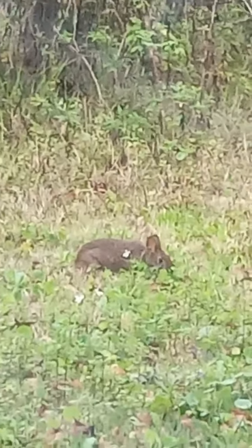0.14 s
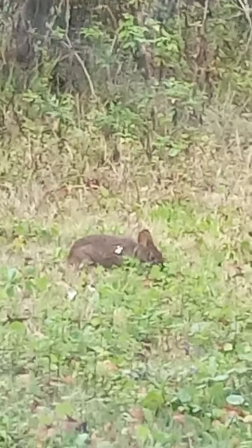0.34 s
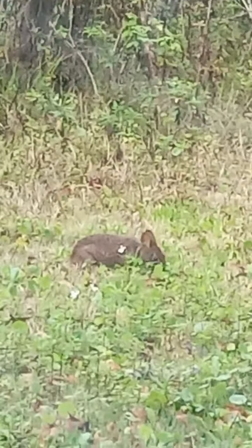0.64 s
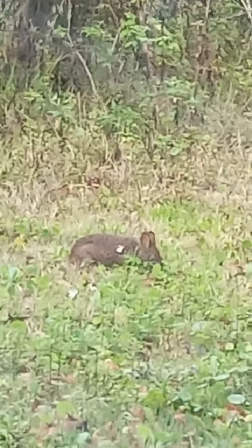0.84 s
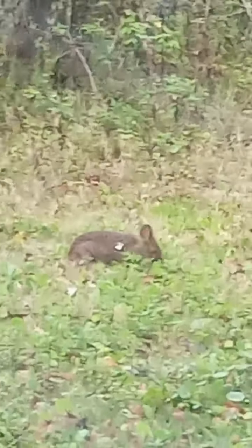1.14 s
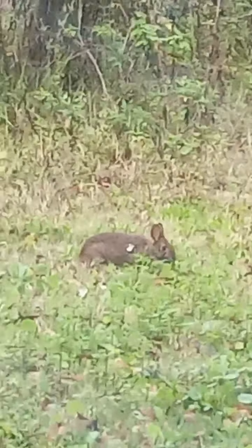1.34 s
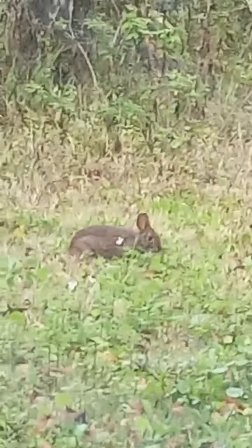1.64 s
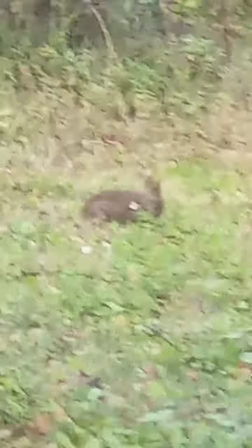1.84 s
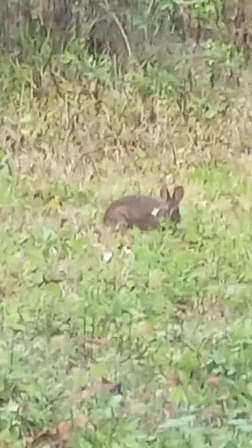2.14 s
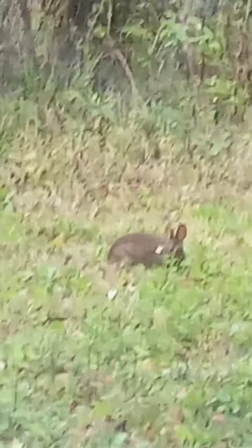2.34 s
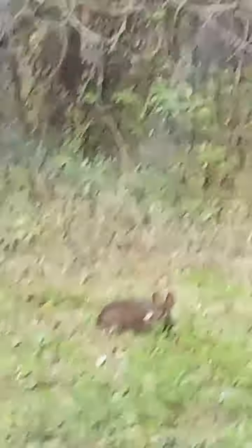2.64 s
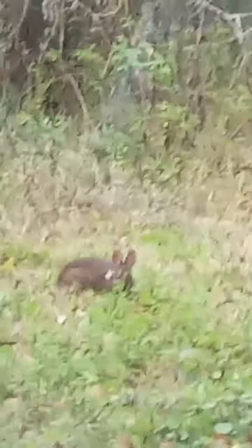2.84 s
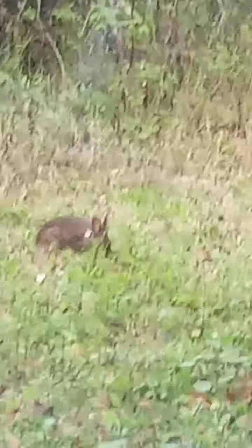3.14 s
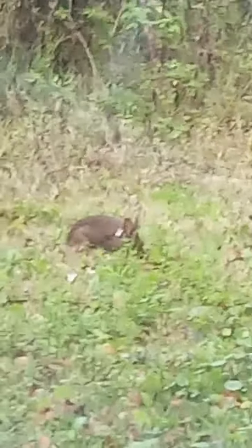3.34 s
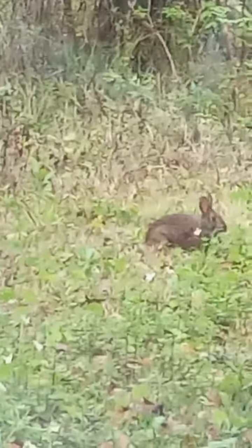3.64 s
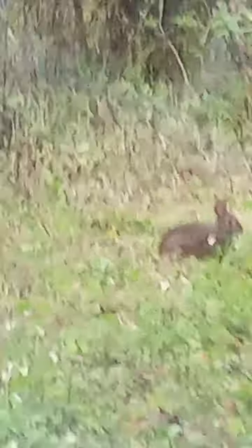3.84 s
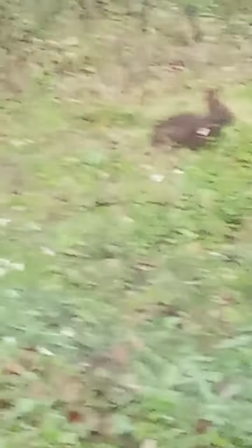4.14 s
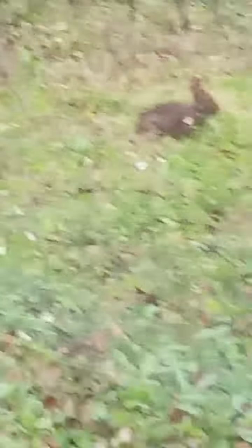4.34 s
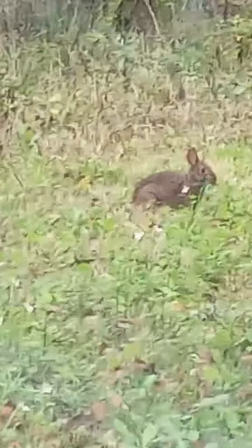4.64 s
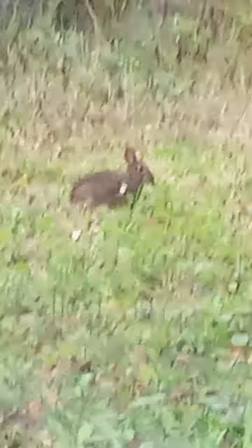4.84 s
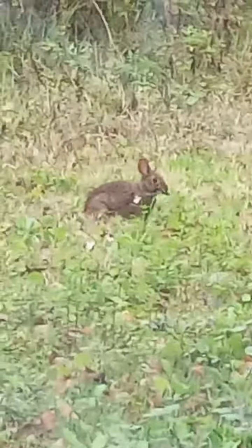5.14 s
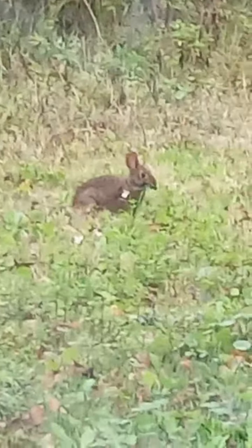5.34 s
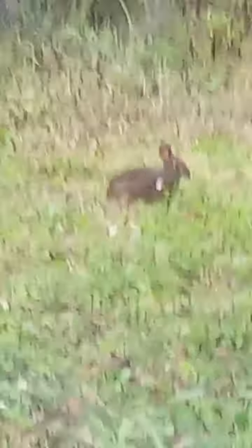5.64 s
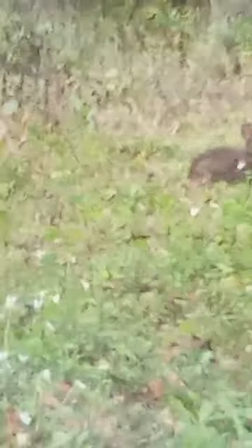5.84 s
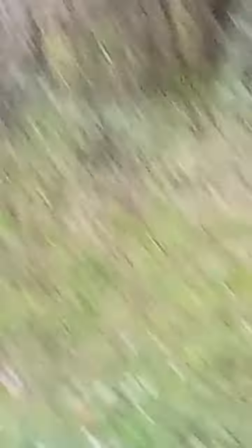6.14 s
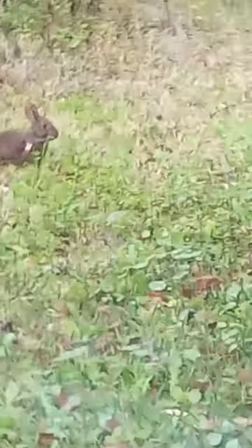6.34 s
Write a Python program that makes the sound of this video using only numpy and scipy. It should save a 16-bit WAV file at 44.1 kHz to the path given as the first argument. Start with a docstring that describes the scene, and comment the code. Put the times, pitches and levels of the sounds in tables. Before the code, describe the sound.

Someone clicks their tongue six times outdoors while fingers bump the microphone and far traffic rumbles softly.

```python
"""Six sharp clicks close by, probably a tongue: quick, briefly ringing double pulses in two colours.
A hand holds a phone: soft knocks swing it, fingers tick and rub on the case.
Behind, distant road traffic rumbles over a meadow, with an engine drone and faint whistles.
Two microphone ports hear nearly the same sound, the left one about a millisecond late."""
import sys
import numpy as np
from scipy import signal
from scipy.fft import rfft, irfft, next_fast_len
from scipy.io import wavfile
from scipy.ndimage import uniform_filter1d

SR = 44100
rng = np.random.default_rng(int(sys.argv[2]) if len(sys.argv) > 2 else 0)


def waveform_to_disk(signal):
    """Save audio, clipped to [-1, 1], as 16-bit WAV at the path in sys.argv[1]."""
    frames = np.transpose(np.atleast_2d(signal))
    scaled = np.clip(frames, -1, 1) * 32767
    samples = np.round(scaled).astype(np.int16)
    wavfile.write(sys.argv[1], SR, samples)


N = 286058

# Each row: start in seconds, peak in dB, click colour from 0 to 1.
TONGUE_CLICKS = [(2.5081, -16, 0.1), (2.8467, -18, 0.94), (3.1859, -15.5, 0.11), (3.5470, -17, 0.93),
                 (3.8659, -16, .12), (4.017, -17.5, 0.93)]
# Resonances of a click in Hz.
MODE_HZ = [1050, 1388, 1458, 1750, 1870, 2036, 2136, 2222, 2630, 2805, 3165, 3375, 3635, 3950, 4270, 8500]
# One row per resonance. Each row: t60 in seconds, gain in dB at colour 0, gain in dB at colour 1.
MODE_RING = [(.05, -57.5, -46), (0.026, 0, 0.5), (0.02, -9.5, 1), (0.031, 0.8, -6.5), (0.059, -27, -7.5),
             (0.19, -7.5, -29.5), (0.016, -31, 3.5), (0.022, -2.5, -9.5), (.04, -21.5, -2.5),
             (0.051, -12, -12.5), (0.024, -13, -9.5), (.025, -18, -18), (.03, -35, -24), (.03, -39, -25),
             (0.042, -45.5, -51.5), (0.044, -41, -56.5)]
# Each row: start in seconds, level in dB, frequency in Hz, t60 in seconds.
PHONE_KNOCKS = [(0.113, -44, 315, 0.22), (2.03, -35, 302, 0.026), (2.048, -33.5, 152, 0.058),
                (2.084, -40., 1356, 0.039), (2.116, -30.5, 1455, 0.032), (2.115, -45.5, 906, 0.054),
                (2.438, -43, 146, 0.24), (3.941, -28.5, 928, 0.086), (3.947, -24, 508.8, 0.068),
                (3.955, -19, 254, 0.08), (3.979, -31.5, 115.8, 0.23), (5.627, -36.5, 138, 0.079),
                (5.8339, -13, 210, 0.059), (5.832, -25.5, 118.6, 0.17), (5.8512, -14, 202, 0.061),
                (5.878, -27.5, 173.4, 0.099)]
# Each row: time in seconds, peak in dB, centre in Hz, spread in octaves, rise and t60 in seconds.
CASE_TICKS = [(1.226, -52, 6000, 1.6, 0.00081, 0.011), (1.514, -56, 5900, 1.1, 0.001, 0.0083),
              (1.755, -49, 903, 0.14, 0.0037, 0.053), (1.874, -52, 3900, 0.86, 0.0014, 0.0075),
              (2.03, -47.5, 1040, 0.71, 0.0018, 0.078), (2.0842, -33, 4170, 0.58, 0.0012, 0.032),
              (2.116, -31.5, 2940, 0.84, 0.0031, 0.051), (3.917, -35, 5608, 0.3, 0.0016, .03),
              (3.948, -14, 3800, 1.43, 0.0044, 0.047), (5.624, -23.5, 5000, 0.85, 0.00096, 0.0036),
              (5.729, -41, 4160, 1.58, 0.001, 0.047), (5.834, -38, 5060, 1.07, 0.0028, 0.027),
              (6.060, -47, 3270, 0.54, .0011, .012), (6.081, -27, 8200, 1.2, 0.00059, 0.016),
              (6.1211, -28, 6600, 0.8, 0.00078, 0.012), (6.369, -60, 7000, 0.97, .0008, 0.007),
              (6.4546, -48, 3200, 0.36, 0.0018, 0.071)]
# Each row: start, crest and end in seconds, crest level in dB, centre in Hz, spread in octaves,
# top hiss in dB relative to the main band.
FINGER_STROKES = [(1.031, 1.057, 1.11, -68, 5000, 0.46, -5), (1.203, 1.226, 1.265, -67, 2940, .75, 8),
                  (1.202, 1.58, 1.95, -74, 2750, 1.05, -14), (1.999, 2.14, 2.3, -68.5, 2460, 1.3, -32),
                  (2.248, 2.41, 2.52, -67, 2830, 1.17, -29), (2.543, 2.57, 2.62, -65.5, 5500, 0.77, -10),
                  (2.577, 2.643, 2.7, -64.5, 5600, 0.49, -12), (3.879, 3.934, 3.95, -50, 5170, 1, -26),
                  (3.917, 3.949, 3.975, -35, 4800, 1.3, -6), (3.961, 3.99, 4.05, -48, 5550, 0.53, -13),
                  (4.003, 4.038, 4.11, -56, 4930, 0.87, -10), (5.621, 5.623, 5.68, -57.5, 3930, 0.85, -20),
                  (5.696, 5.739, 5.78, -60, 2580, 1.2, -24), (5.747, 5.798, 5.9, -54.5, 3500, 0.9, -7.5),
                  (5.867, 5.994, 6.1, -69, 2100, 0.16, -17), (5.899, 6.088, 6.14, -56.5, 4200, 0.81, 1),
                  (6.098, 6.138, 6.26, -51.5, 5000, 0.88, -31), (6.249, 6.312, 6.37, -60.5, 2320, 0.5, -20),
                  (6.269, 6.34, 6.42, -58, 4430, 0.31, -12), (6.434, 6.468, 6.49, -64, 3500, .95, -10)]
# Port response to sound made on the case. Each row: frequency in Hz, gain in dB.
CASE_RESPONSE = [(200, 2.5), (1000, 11.5), (5000, -0.5), (6800, 1), (8000, -12.5), (9300, -6), (11000, -3),
                 (13000, -11.5)]
# Tyre and engine wash. Each row: frequency in Hz, relative density in dB.
ROAD_SPECTRUM = [(20, -15), (35, -7), (54, -12.5), (70, -3), (150, -5.5), (300, -6), (450, -11.5),
                 (600, -14), (900, -23.5), (1300, -28), (2500, -34.5), (5000, -38.5), (7000, -43),
                 (8200, -53), (13000, -51.5)]
# Each row: time in seconds, rumble gain in dB, tyre hiss gain in dB.
ROAD_SWELL = [(0.0, 1, 0.5), (6.49, 0.5, 1)]
# Level of the low engine drone, wavering unevenly. Each row: time in seconds, level in dB.
DRONE_LEVEL = [(0.0, -55), (0.25, -72), (0.45, -57), (0.7, -65), (1.2, -63.5), (1.42, -52.5), (1.6, -61),
               (1.75, -49), (1.97, -59), (2.1, -56.5), (2.75, -60), (2.96, -71.5), (3.35, -56), (3.7, -63),
               (4.15, -52.5), (4.27, -63), (4.55, -52.5), (4.63, -64), (4.78, -46), (4.88, -62),
               (5.04, -51), (5.12, -64), (5.25, -56.5), (6.2, -55.5), (6.49, -58)]
# Each row: start and end in seconds, pitch in Hz, level in dB.
ENGINE_NOTES = [(0.0, 0.617, 142, -59.5), (0.75, 1.507, 142.5, -60.5), (1.9, 2.554, 144, -62),
                (3.0, 3.503, 143.2, -63), (4.15, 4.6, 119.4, -61.5), (4.7, 5.808, 145, -63),
                (5.97, 6.5, 117, -56)]
# Each row: start and end in seconds, pitch in Hz, level in dB.
FAR_WHISTLES = [(1.553, 1.771, 3210, -78), (1.579, 1.751, 1794, -76), (2.327, 2.45, 3370, -88)]
# Each row: frequency in Hz, coherence of the two ports from 0 to 1.
PORT_COHERENCE = [(50, .99), (550, .998), (1600, .99), (2700, .97), (3800, .92), (5500, .75), (10000, .45)]
# Each row: frequency in Hz, left port gain in dB.
LEFT_RESPONSE = [(50, -2.4), (250, -1.9), (480, -.1), (2000, .1), (6000, -.3), (9000, -2.), (12000, -5.)]


def gain_of(db):
    """Decibels to a factor."""
    return 10 ** (np.asarray(db) / 20)


def unit_rms(x):
    """Scales to rms 1."""
    return x / np.sqrt(np.mean(x ** 2) + 1e-20)


def curve_at(points, hz):
    """Interpolates over log frequency."""
    point_hz, value = np.transpose(points)
    return np.interp(np.log(hz + 1), np.log(point_hz + 1), value)


def add(mix, start_s, sound):
    """Mixes a sound in at start_s."""
    part = mix[..., round(start_s * SR):][..., :sound.shape[-1]]
    part += sound[..., :part.shape[-1]]


def band(hz, centre_hz, octaves):
    """Bell over log frequency, rms 1."""
    bell = np.exp(-.5 * (np.log2((hz + 1) / centre_hz) / octaves) ** 2)
    return unit_rms(bell)


def flutter(hz, t, frames):
    """Random frequency-by-time field, smoothed in time, rms 1."""
    return unit_rms(uniform_filter1d(rng.standard_normal((len(t), len(hz))).T, frames, axis=1))


def port_noise(spectrum, fft_size, length, blend):
    """Two-port noise with gain spectrum(hz, t); blend pulls the coherence toward 1."""
    hop = fft_size // 4
    hz, t = np.fft.rfftfreq(fft_size, 1 / SR)[:, None], np.arange(length // hop + 5) * hop / SR
    a, b, c, d = rng.standard_normal((len(t), len(hz), 4)).T
    shared, separate = a + 1j * b, c + 1j * d
    coherence = 1 - (1 - blend) * (1 - curve_at(PORT_COHERENCE, hz))
    left = coherence * shared + np.sqrt(1 - coherence ** 2) * separate
    bins = np.array([left, shared]) * spectrum(hz, t)
    return signal.istft(bins, nperseg=fft_size, noverlap=fft_size - hop)[1][:, :length]


def far_tone(t, hz, db, waver_db, waver_hz):
    """Sine whose level and phase wander at random."""
    span = int(SR / waver_hz)
    level_drift, phase_drift = [unit_rms(uniform_filter1d(uniform_filter1d(noise, span), span))
                                for noise in rng.standard_normal((2, len(t)))]
    phase = 2 * np.pi * np.cumsum(np.broadcast_to(hz, t.shape)) / SR + 0.97 * phase_drift
    return np.sqrt(2) * gain_of(db + waver_db * level_drift) * np.sin(phase)


def clicks():
    """Probably a tongue: a quick double pulse rings briefly and dies fast; two colours alternate."""
    out, t = np.zeros(N), np.arange(3500) / SR
    scatters = rng.standard_normal((len(TONGUE_CLICKS), len(t))) * gain_of(-60 * t / 0.065) * (t > .004)
    for (start_s, peak_db, colour), scatter in zip(TONGUE_CLICKS, scatters):
        ring = np.zeros(len(t))
        for k, (hz, (t60_s, colour0_db, colour1_db)) in enumerate(zip(MODE_HZ, MODE_RING)):
            mode_db = colour0_db + colour * (colour1_db - colour0_db)
            ring += (-1) ** k * gain_of(mode_db - 60 * t / t60_s) * np.sin(2 * np.pi * hz * t)
        ring *= np.sin(np.pi / 2 * np.minimum(t / 0.0032, 1)) ** 2  # attack
        ring *= gain_of(-9 * (t / 0.0091) ** 2)  # dies ever faster
        pulse_gap_s = np.interp(colour, [0, 1], [0.0029, 0.00216])
        second_pulse_db = np.interp(colour, [0, 1], [1, -12.5])
        ring += gain_of(second_pulse_db) * np.interp(t - pulse_gap_s, t, ring, left=0)
        tail = signal.fftconvolve(ring, scatter / np.linalg.norm(scatter))[:len(t)]
        ring += gain_of(0.5) * signal.lfilter([1, -0.83], [1], tail)  # tail leans to the treble
        add(out, start_s, gain_of(peak_db) * ring / abs(ring).max())
    return out


def knocks():
    """Each knock sets the phone or its case swinging as a damped sine."""
    out, t = np.zeros(N), np.arange(12000) / SR
    for start_s, db, hz, t60_s in PHONE_KNOCKS:
        push = np.sin(np.pi / 2 * np.minimum(t * hz, 1)) ** 2  # soft flesh pushes for one cycle
        add(out, start_s, gain_of(db - 60 * t / t60_s) * np.sin(2 * np.pi * hz * t) * push)
    return out


def ticks():
    """Fingers tick on the case: noise cracks with a fast rise, a decay and a faint tail."""
    out, t = np.zeros((2, N)), np.arange(-600, 3000) / SR
    for time_s, peak_db, centre_hz, octaves, rise_s, t60_s in CASE_TICKS:
        def spectrum(hz, _):
            return band(hz, centre_hz, octaves) * gain_of(curve_at(CASE_RESPONSE, hz))
        crack = port_noise(spectrum, fft_size=256, length=len(t), blend=0.34)
        decay = gain_of(-60 * t / t60_s) + gain_of(-32 - 60 * t / 0.27)
        crack *= np.where(t < 0, np.exp(t / rise_s), decay)
        add(out, time_s + t[0], gain_of(peak_db) * crack / abs(crack).max())
    return out


def rubs():
    """Skin slides on the case: a grainy noise band with hiss on top; each stroke swells and fades."""
    out = np.zeros((2, N))
    for start_s, crest_s, end_s, crest_db, centre_hz, octaves, hiss_db in FINGER_STROKES:
        def spectrum(hz, t):
            colour = band(hz, centre_hz, octaves) + gain_of(hiss_db) * band(hz, 11000, octaves=0.3)
            flutter_db = 4.5 * flutter(hz, t, frames=24)
            grain_db = 3.4 * rng.standard_normal(len(t))  # stick and slip
            return colour * gain_of(curve_at(CASE_RESPONSE, hz) + grain_db + flutter_db)
        length = int((end_s - start_s) * SR)
        stroke = unit_rms(port_noise(spectrum, fft_size=256, length=length, blend=0.4))
        swell_db = np.interp(start_s + np.arange(length) / SR, [start_s, crest_s, end_s], [-14, 0, -17.5])
        fade = signal.windows.tukey(length, 600 / length)
        add(out, start_s, stroke * gain_of(crest_db + swell_db) * fade)
    return out


def road(level_db=-55):
    """Distant traffic rumble and hiss, with a random flutter in level across frequency."""
    swell_s, rumble_db, hiss_db = np.transpose(ROAD_SWELL)

    def spectrum(hz, t):
        wide_flutter_db = 2 * unit_rms(uniform_filter1d(flutter(hz, t, frames=10), size=12, axis=0))
        fine_flutter_db = 3.2 * flutter(hz, t, frames=6)
        hiss_share = 1 / (1 + (760 / (hz + 1)) ** 2)
        swell_db = (1 - hiss_share) * np.interp(t, swell_s, rumble_db)
        swell_db += hiss_share * np.interp(t, swell_s, hiss_db)
        return gain_of(curve_at(ROAD_SPECTRUM, hz) + swell_db + wide_flutter_db + fine_flutter_db)
    return gain_of(level_db) * unit_rms(port_noise(spectrum, fft_size=2048, length=N, blend=0))


def engines(from_hz=67.3, to_hz=72.6, settle_s=1.274):
    """A drone speeds up a little, then holds; other engine notes come and go."""
    t = np.arange(N) / SR
    firing_hz = np.interp(t, [0, settle_s], [from_hz, to_hz])
    drone_db = np.interp(t, *np.transpose(DRONE_LEVEL))
    out = far_tone(t, firing_hz, drone_db, waver_db=1, waver_hz=13)
    out += far_tone(t, hz=706, db=-84, waver_db=4, waver_hz=3)  # faint whine
    for start_s, end_s, hz, db in ENGINE_NOTES:
        t = np.arange(start_s, end_s, 1 / SR)
        note = far_tone(t, hz, db, waver_db=1.5, waver_hz=20)
        add(out, start_s, note * signal.windows.tukey(len(t), 0.41))
    return out


def whistles():
    """Thin, faint notes, perhaps a far bird."""
    out = np.zeros(N)
    for start_s, end_s, hz, db in FAR_WHISTLES:
        t = np.arange(start_s, end_s, 1 / SR)
        note = far_tone(t, hz, db, waver_db=4.5, waver_hz=130)
        add(out, start_s, note * signal.windows.tukey(len(t), 0.3))
    return out


def scene():
    """All sources at the two ports."""
    return road() + engines() + whistles() + clicks() + knocks() + ticks() + rubs()


def record(dry):
    """The left port is late and has its own colour; both lose deep bass and top treble."""
    lag_samples, highpass_hz, lowpass_hz = 41, 50, 13250
    size = next_fast_len(N + 4096)
    hz = np.fft.rfftfreq(size, 1 / SR)
    delay = np.exp(-2j * np.pi * hz * lag_samples / SR)
    left = irfft(rfft(dry[0], size) * gain_of(curve_at(LEFT_RESPONSE, hz)) * delay, size)[:N]
    highpass = signal.butter(2, highpass_hz, "highpass", fs=SR, output="sos")
    lowpass = signal.firwin(201, lowpass_hz, window=("kaiser", 9), fs=SR)
    return signal.oaconvolve(signal.sosfilt(highpass, [left, dry[1]]), lowpass[None], "same")


dry = scene()
out = record(dry)
waveform_to_disk(out)
```